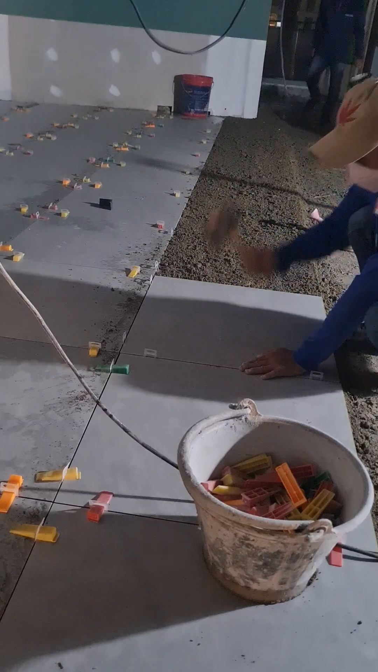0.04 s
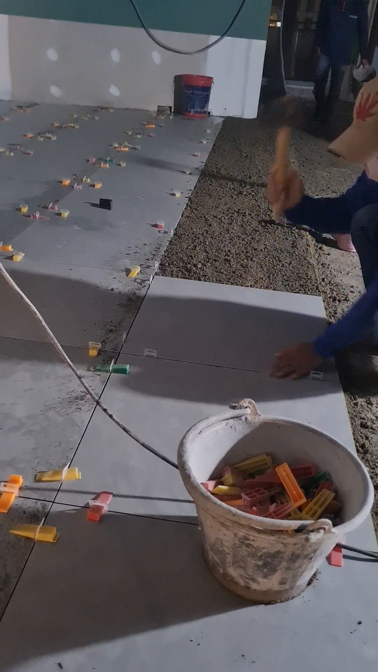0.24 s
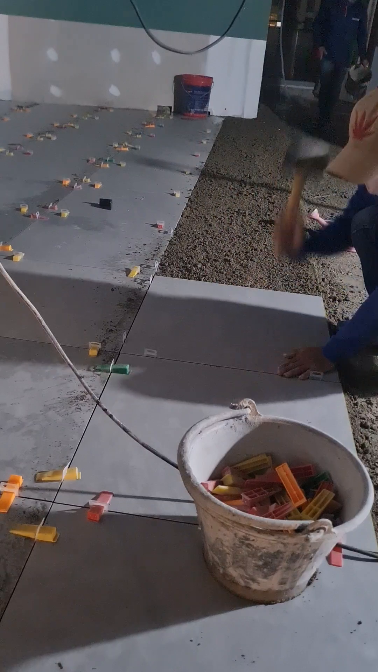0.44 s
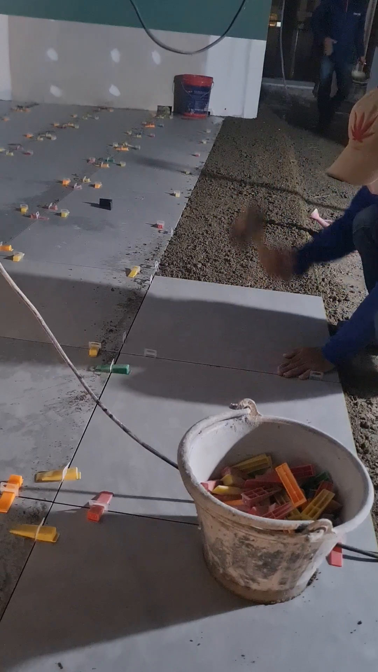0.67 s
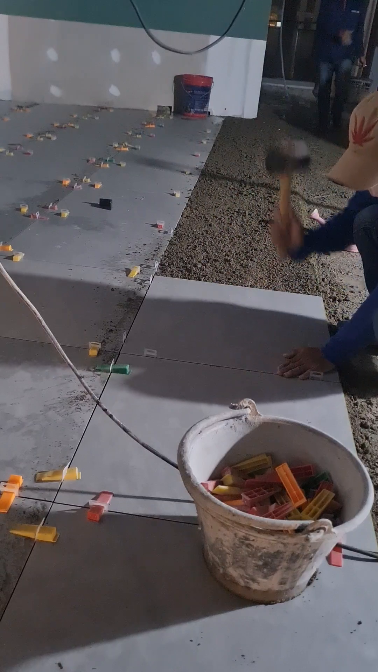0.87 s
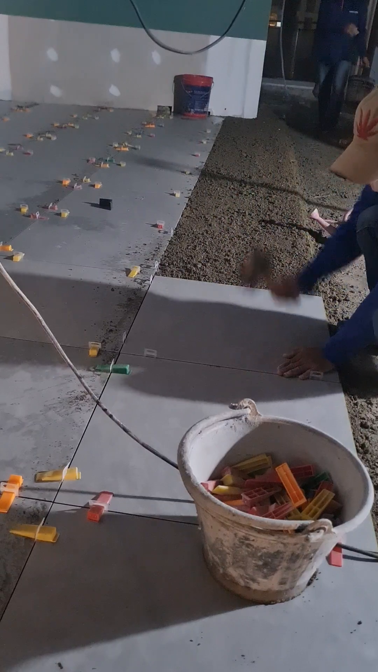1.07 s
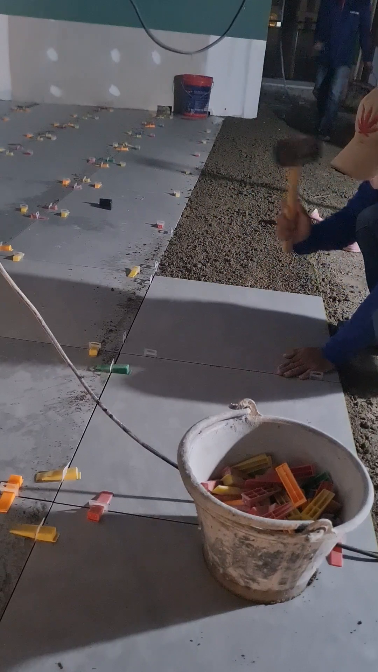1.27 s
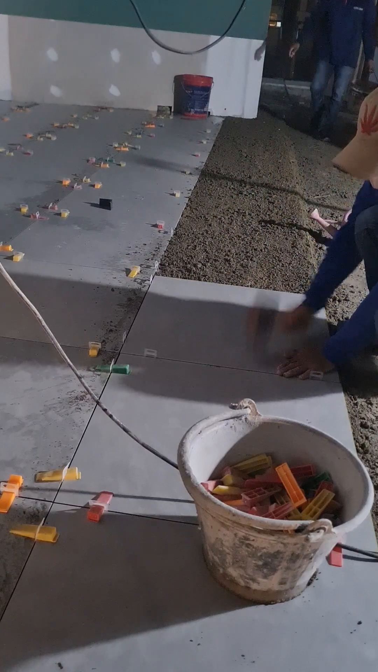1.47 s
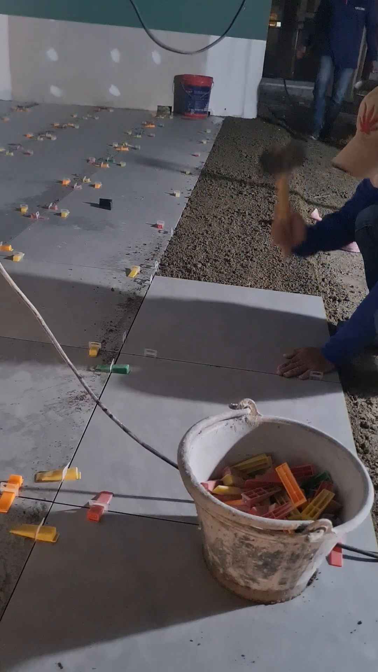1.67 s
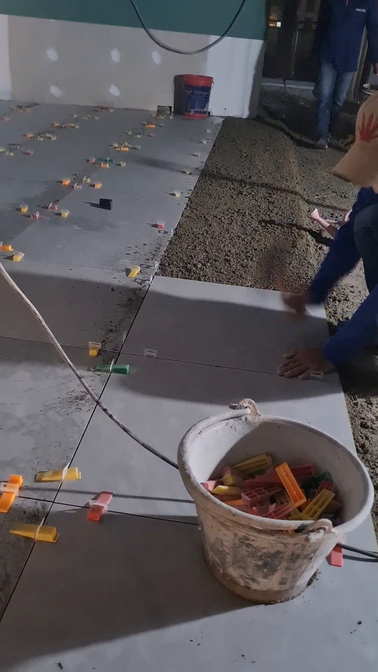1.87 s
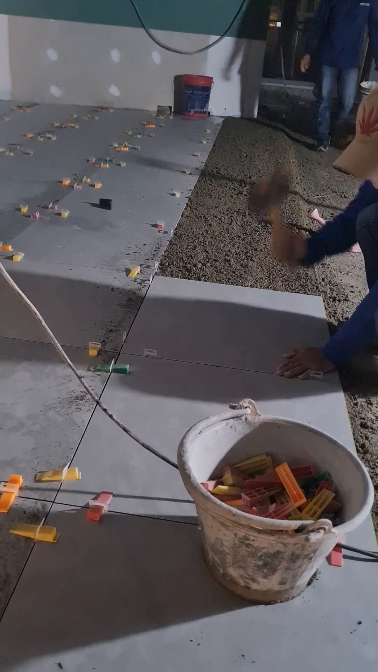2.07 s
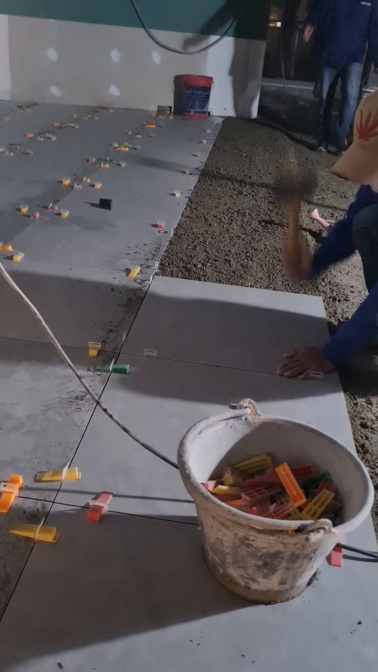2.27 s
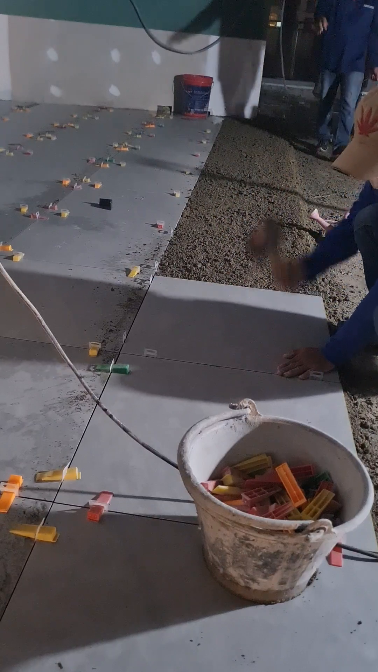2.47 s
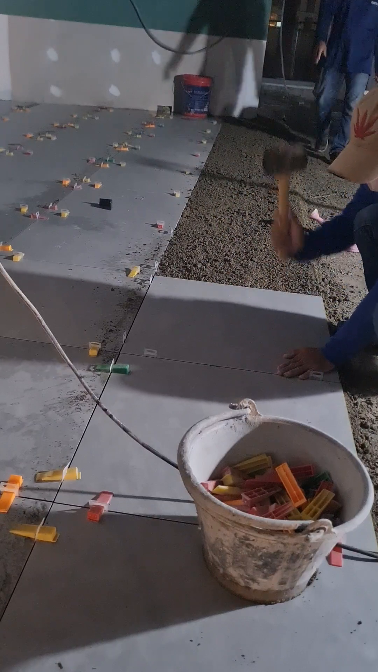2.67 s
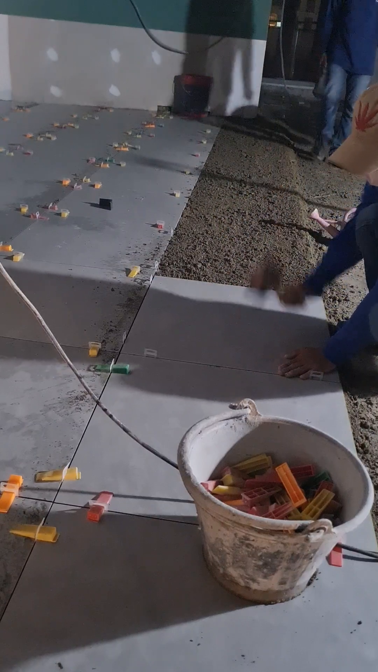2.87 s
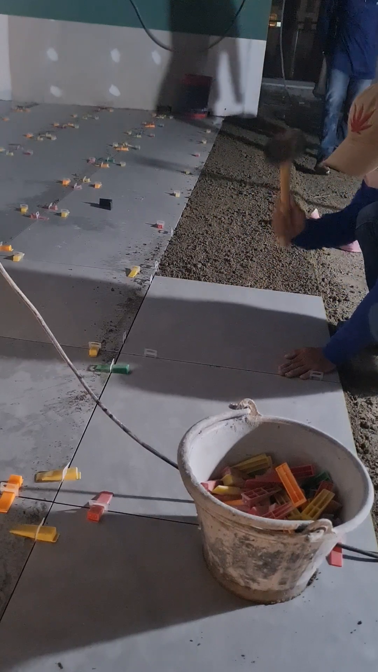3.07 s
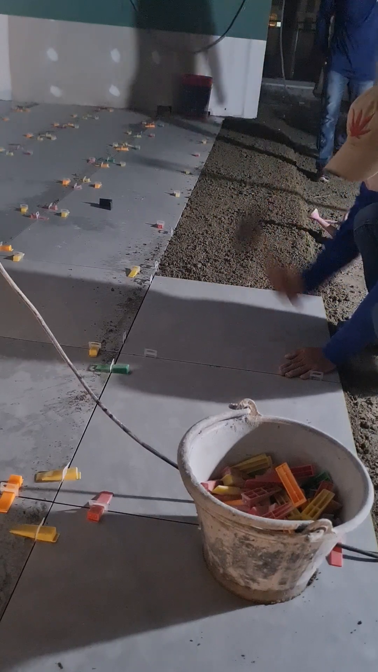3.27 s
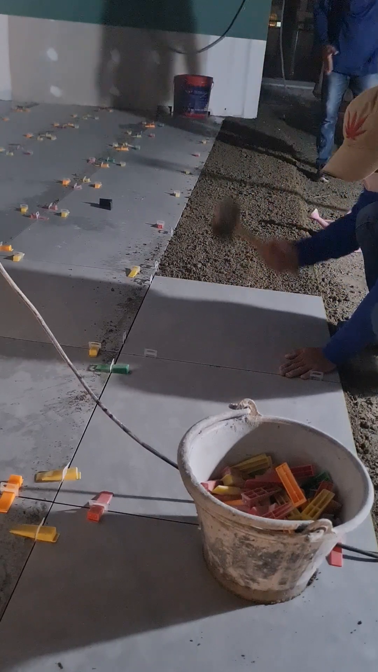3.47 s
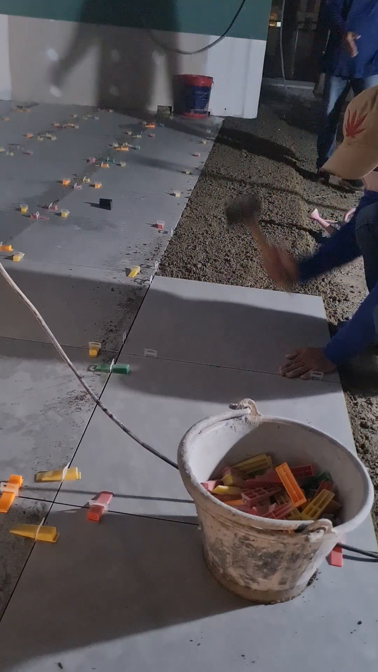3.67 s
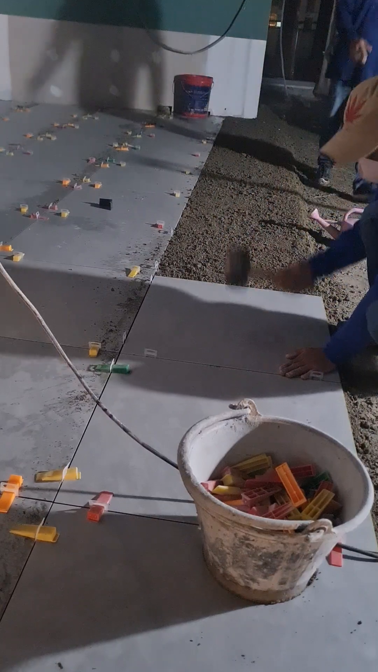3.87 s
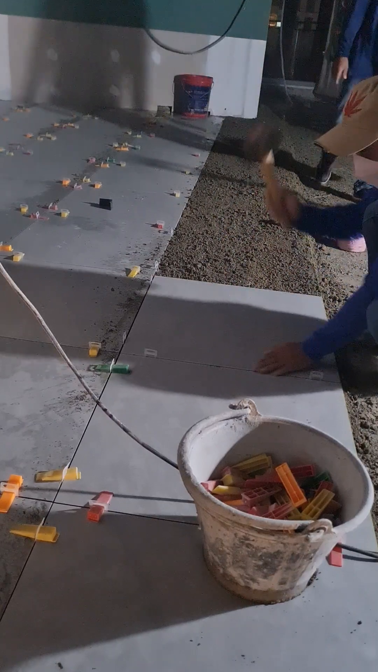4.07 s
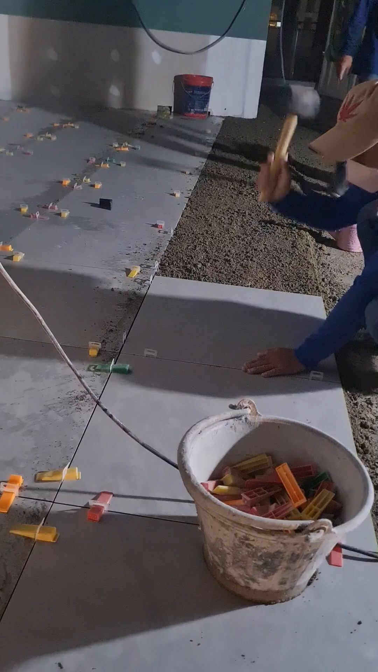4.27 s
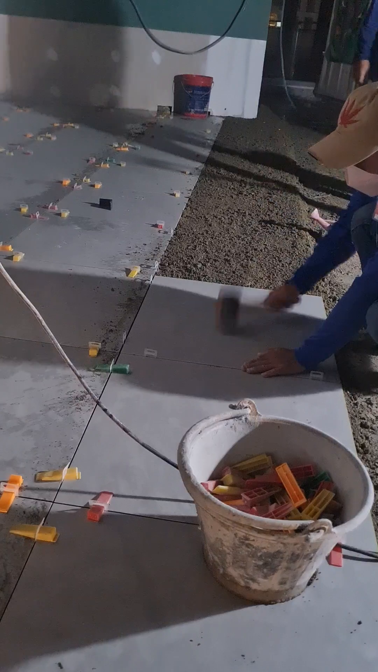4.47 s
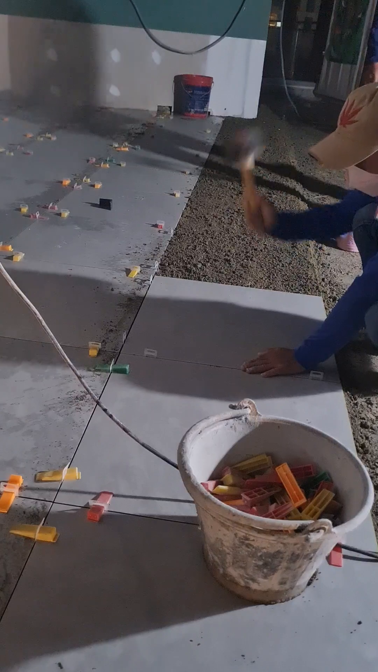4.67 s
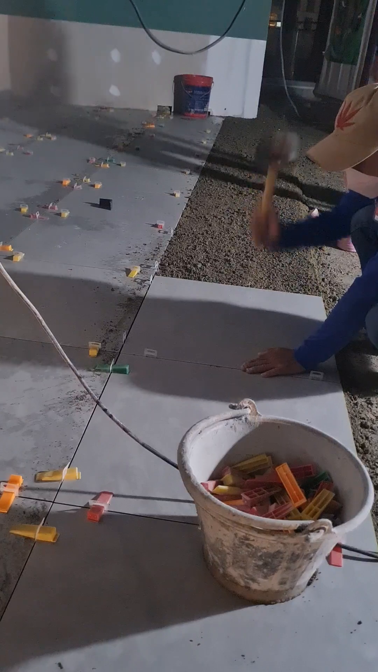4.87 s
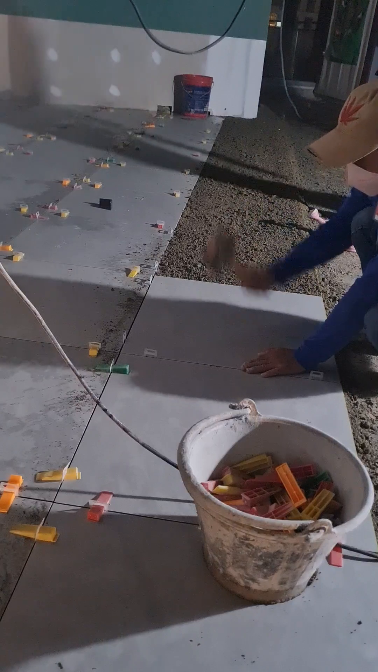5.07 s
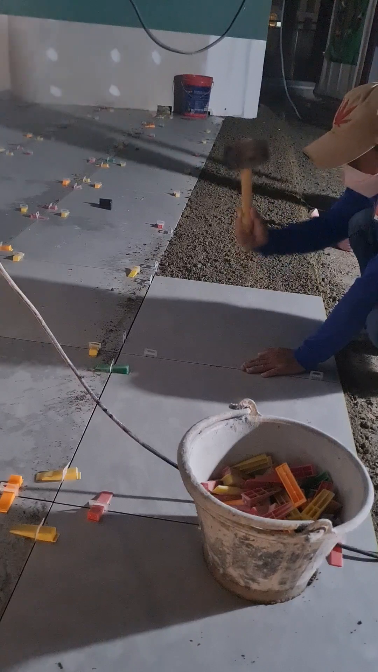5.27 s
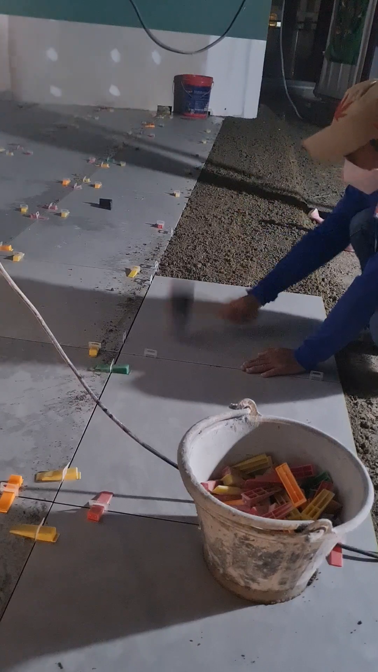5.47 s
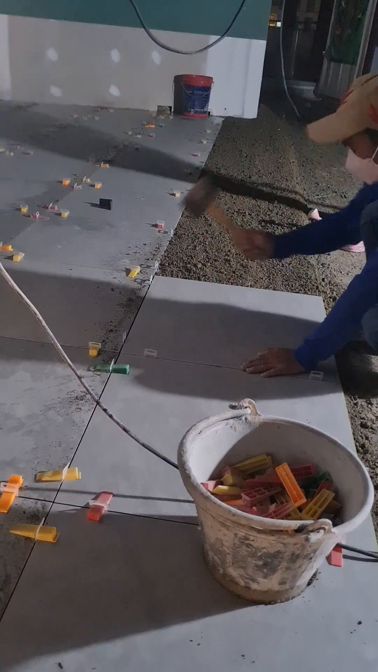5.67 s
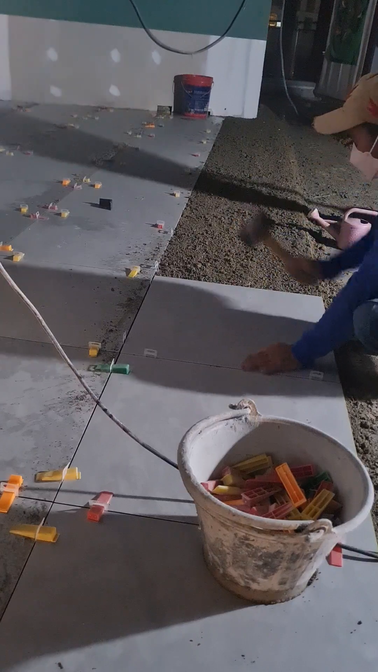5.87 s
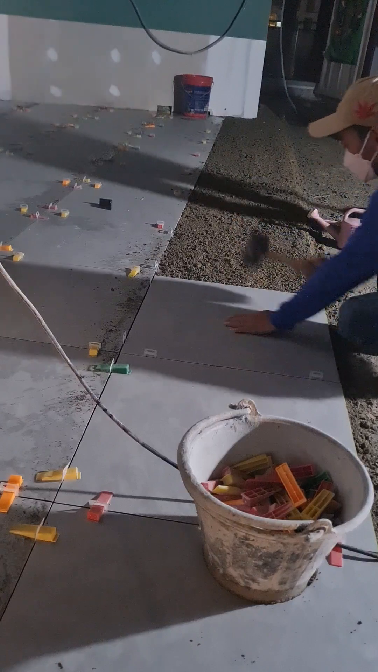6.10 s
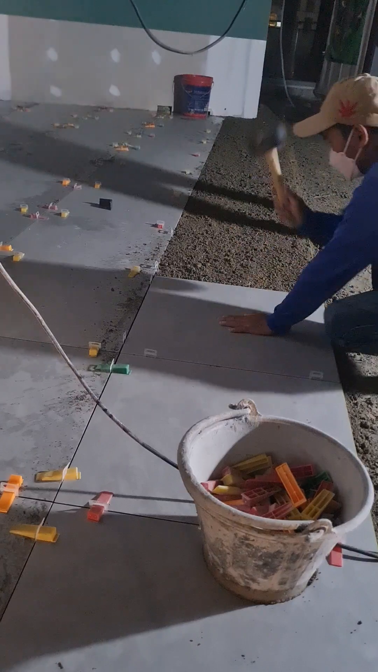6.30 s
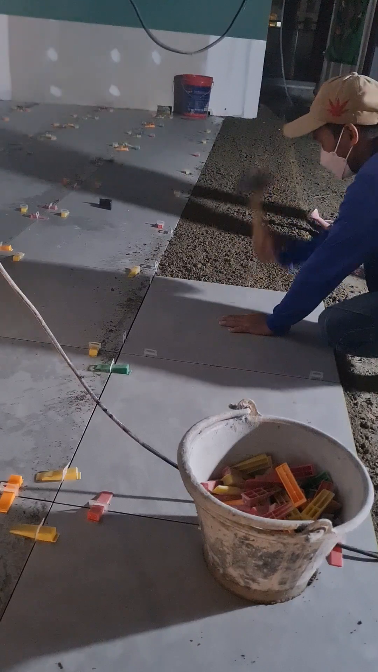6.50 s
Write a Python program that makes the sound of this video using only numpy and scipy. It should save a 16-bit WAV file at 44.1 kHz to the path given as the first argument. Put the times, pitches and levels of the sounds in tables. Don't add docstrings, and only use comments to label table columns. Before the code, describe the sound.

The tail of an earlier mallet blow fades at the start with a brief gritty scuff. From 0.6 seconds, a rubber mallet hits a large floor tile close by, at about 0.6, 1.0, 1.5, 1.95, 2.4 and 2.85: low thud, short knock and airy slap, ringing through a bare concrete hall. A hard wedge tick follows the 1.5 blow, with light rubber grazes around 1.6 and faint wedge chatter near 2.0 and 2.7. Blows at 3.4 and 3.8 are duller, with little slap. After a gap with a small low tap at 4.4, fuller slapping blows land at 4.5, 5.0 and 5.5, the last followed by a sharp grit click. Its resonance dies away; soft scuffing and a low tap come around 6.1, then a tiny tick near 6.5. Faint grit drags and distant site rumble continue throughout.

```python
import sys
import numpy as np
from scipy import signal
from scipy.fft import rfft, irfft
from scipy.io import wavfile
from scipy.ndimage import uniform_filter1d

SR = 44100
rng = np.random.default_rng(int(sys.argv[2]) if len(sys.argv) > 2 else 0)


def to_wav(sig):
    pcm = np.clip(np.atleast_2d(sig), -1, 1) * 32767
    pcm = np.round(pcm).astype(np.int16)
    wavfile.write(sys.argv[1], SR, pcm.T)


def field_ratio(decibels):
    return 10 ** (np.asarray(decibels, dtype=float) / 20)


N = 288414
LEAD = SR // 4

# (time [s], slap [dB], thud [dB], knock [dB], contact [ms])
BLOWS = [(0.5961, -8, -21, -16, 1), (1.0435, -8.5, -19, -14.5, 0.88), (1.4914, -5, -19.5, -14.5, 0.88),
         (1.95, -7, -19.5, -13, 0.94), (2.403, -6, -19, -14, 0.78), (2.8537, -11, -19.5, -12.5, 1.15),
         (3.367, -24, -15.5, -12, 1.03), (3.804, -30.5, -14, -14.5, 2), (4.5119, -8, -14, -14, 1.17),
         (5.034, -9, -13, -9, 1.5), (5.4863, -24, -25.5, -14, 1.2), (5.4926, -8, -14, -15.5, 0.74)]
EARLIER_BLOW = (-.07, -11, -19.5, -18, .9)
# (time [s], slap [dB])
TOUCHES = [
    (1.6107, -24),
    (1.6483, -26),
]
MOVE_TIMES_S = [3.2, 4.2, 4.9, 5.49]
SPOT_TREBLE_DB = [-11.5, -12, -18, -24.5, -10]
# (frequency [Hz], level [dB])
SLAP_SPECTRUM = [(300, -5), (800, 3.5), (1600, 3.5), (2500, -4), (4500, -1.5), (7000, -1.5), (10000, -2.5),
                 (14000, -3.5), (17000, -16)]
# (frequency [Hz], left minus right [dB])
SLAP_LEAN = [(300, 5.5), (3500, -1), (5500, 7), (8000, 2.5), (11000, -2), (14000, 0)]
# (delay [s], level [dB])
FLOOR_ECHO = (0.00421, -20)
# (time [s], level [dB], frequency [Hz], T60 [s], pan [dB])
TICKS = [
    (1.512, -13.5, 2120, 0.013, 0),
    (1.535, -27, 2020, 0.028, 16),
    (1.6492, -23, 2430, 0.0084, -4),
    (2.0, -28.5, 2010, 0.053, -2),
    (4.37, -28, 432, 0.021, -3),
    (5.523, -12, 5230, 0.0033, -12),
    (6.102, -25.5, 425, 0.017, 7),
    (6.519, -41, 630, 0.09, 0),
]
# (frequency [Hz], T60 [s])
HALL_T60 = [(60, 1), (160, 0.91), (420, 0.79), (650, 0.73), (1300, 0.68), (2900, 0.77), (7000, 0.61),
            (14000, 0.41)]
# (frequency [Hz], level [dB])
HALL_SPECTRUM = [(45, -20), (80, -5.5), (160, 1), (420, -5), (640, 0.5), (950, -5), (1400, -3.5),
                 (2900, -0.5), (7000, 2.5), (15000, -3)]
# (delay [s], level [dB], pan [dB])
WALL_ECHOES = [(0.0157, -18.5, 14), (0.0315, -18.5, 16)]
# (frequency [Hz], level [dB], T60 [s])
SPOT_MODES = [
    [(110.4, -1.5, 0.7), (158.2, -5.5, 1), (210.3, 0, 0.63), (311.3, -4.5, 0.98), (340.5, -3.5, 0.99),
     (454, 1, 0.28)],
    [(104.6, -13, 1.0), (123.7, -3.5, 0.4), (175, -15, 0.4), (230.6, 4.5, 0.33), (299.6, -3.5, 0.88)],
    [(120, -4, 1.0), (171, 0.5, 0.82), (177.7, 0, 1), (414, 4.5, 0.26)],
    [(129.3, -2.5, 0.57), (164, -2.5, 0.8), (174, -5, 1), (450.5, 1, 0.21)],
    [(129, 3, 0.5), (167.5, -5.5, 0.94), (193, -2, 0.84), (266, 3.5, 0.78), (288, 7.5, 0.89),
     (300, 7.5, 0.69)],
]
# (bass [dB], treble [dB])
SPOT_REACH = [(1, 1.5), (-5, -6), (1, 0), (-2.5, -4), (-1.5, 2.5)]
# (frequency [Hz], correlation [0-1])
CHANNEL_LIKENESS = [(60, 1), (180, 0.92), (400, 0.68), (800, 0.063), (1600, 0), (5000, 0), (15000, 0)]
# (frequency [Hz], left minus right [dB])
DIFFUSE_LEAN = [(60, 1.5), (500, 2.6), (2000, 2.5), (6000, 3), (8000, 5.5), (10500, -1), (13000, 4),
                (16000, -5)]
# (peak time [s], level [dB], rise [s], fall [s], tilt [dB/octave])
SCUFFS = [(0.005, -31, .05, 0.16, 5.3), (.25, -46, 0.9, 0.26, 0.5), (.7, -42.5, 0.15, 0.27, 0.5),
          (.85, -48, 0.026, 0.079, 3), (1.02, -44, 0.12, 0.092, 4.5), (1.43, -47, 0.95, 0.34, -0.5),
          (1.8, -48, 0.26, 0.55, 1.4), (2.1, -43.5, 0.32, 0.34, -1), (2.62, -49.5, 0.3, .2, 1),
          (2.74, -44.5, 0.13, 0.35, 0), (3.1, -46.5, 0.45, 0.39, 1.8), (3.32, -49.5, 0.17, 0.28, -2),
          (3.781, -46.5, 0.037, 0.23, -1), (3.94, -42.5, 0.16, 0.21, 2.7), (4.19, -51.5, 0.073, 0.43, 1.7),
          (4.31, -49, 0.043, 0.3, -1), (4.7, -49, .3, 0.16, 2), (4.92, -45.5, 0.35, 0.36, 1),
          (5.75, -50, 0.36, 0.41, -3), (5.95, -52.5, .25, 0.28, 6.5), (6.12, -41.5, 0.39, 0.22, 1.7),
          (6.53, -51.5, 0.14, .1, 2)]
# (frequency [Hz], level [dB])
GRIT_SPECTRUM = [(200, -13), (500, -10), (1200, -9.5), (2500, -11), (4200, -14.5), (8000, -24),
                 (12000, -33), (15800, -38)]
# (time [s], length [s], level [dB], frequency [Hz], width [Hz])
CHATTER = [(.945, 0.098, -42, 2840, 900), (1.57, 0.25, -47, 2190, 190), (2.03, 0.13, -53, 12600, 1700),
           (1.996, .12, -43, 1900, 250), (2.703, 0.049, -41, 1500, 600), (2.748, .06, -45, 2200, 350),
           (4.308, 0.11, -48, 1860, 800), (6.512, .03, -46.5, 1360, 450), (6.505, .04, -48, 640, 120),
           (1.2, 0.14, -61, 12000, 1800), (.915, .008, -59, 11300, 1500)]
# (frequency [Hz], level [dB])
SITE_SPECTRUM = [(15, -41), (28, -10), (65, 14), (190, 11.5), (320, -1), (480, -12.5), (900, -13),
                 (3000, -47), (7000, -38), (10000, -48), (15800, -44)]
# (frequency [Hz], gain [dB])
MIC_RESPONSE = [(100, 0), (5000, 0), (8000, 1.5), (9600, 0.5), (11500, 3.1), (13000, 2.5), (15500, 5.5)]


def read(points, hz):
    f, value = np.transpose(points)
    return np.interp(np.log(hz + 1), np.log(f + 1), value)


def evened(x):
    return x / np.sqrt(np.mean(x ** 2) + 1e-20)


def add(mix, start_s, sound):
    part = mix[..., LEAD + round(start_s * SR):][..., :sound.shape[-1]]
    part += sound[..., :part.shape[-1]]


def ring(hz, t60_s, t):
    return field_ratio(-60 * t / t60_s) * np.sin(2 * np.pi * hz * t)


def sides(pan_db):
    return field_ratio(np.array([[pan_db / 2], [-pan_db / 2]]))


def wide_noise(field_db, size, likeness):
    frames, hz = size // 128 + 6, np.fft.rfftfreq(512, 1 / SR)[:, None]
    a, b, c, d = rng.standard_normal((frames, len(hz), 4)).T
    left, other = a + 1j * b, c + 1j * d
    same = np.clip(likeness * read(CHANNEL_LIKENESS, hz), -1, 1)
    z = np.array([left, same * left + np.sqrt(1 - same ** 2) * other])
    lean_db = read(DIFFUSE_LEAN, hz) / 2
    z *= field_ratio(field_db(hz, np.arange(frames) * 128 / SR) + np.array([lean_db, -lean_db]))
    z *= hz < 15900
    return signal.istft(z, nperseg=512, noverlap=384)[1][:, :size]


def blow_body(thud_db, knock_db, contact_ms, t):
    contact = np.sin(np.pi * np.minimum(1000 * t / contact_ms, 1)) ** 2
    thud = ring(155, 0.026, np.maximum(t - .0006, 0))
    knock = .5 * ring(700, .011, t) * np.minimum(t / .0024, 1) - ring(440, .017, t)
    rebound = 0.88 * ring(810, 0.01, np.maximum(t - .0015, 0)) + 0.078 * ring(1200, 0.0056, t)
    body = field_ratio(thud_db + 12) * thud + field_ratio(knock_db + 8.5) * (knock + rebound)
    body = signal.fftconvolve(body, contact / contact.sum())[:len(t)]
    delay_s, echo_db = FLOOR_ECHO
    body = body + field_ratio(echo_db) * np.roll(body, round(delay_s * SR))
    return signal.lfilter(*signal.butter(2, 70, "high", fs=SR), body)


def slap(slap_db, treble_db, t):
    hz = np.fft.rfftfreq(len(t), 1 / SR)
    treble_slope = np.clip(np.log2(hz / 3500 + 1e-9) / 1.35, 0, 1)
    colour = field_ratio(read(SLAP_SPECTRUM, hz) + (treble_db + 3.5) * treble_slope)
    colour = colour * field_ratio(np.outer([.5, -.5, 0], read(SLAP_LEAN, hz)))
    shared, *own, tint = rng.standard_normal((4, len(t)))
    squeeze_db = -1800 * t - 60 * np.maximum(t - .0022, 0) / 0.0092
    onset = np.clip((t - .0002) / 0.00053, 0, 1)
    z = rfft((shared + 0.93 * np.array(own)) * field_ratio(squeeze_db) * onset)
    close = z / abs(z) ** .6
    tint = uniform_filter1d(uniform_filter1d(tint, size=150), size=150)
    tint_db = 1.5 * evened(tint)[:len(hz)]
    far = field_ratio(tint_db) * np.exp(-2j * np.pi * hz * (.0015 + hz * 4e-8))
    puff = irfft(np.vstack([close, far]) * colour)
    puff[:, 1000:] = 0
    rms = np.sqrt(np.mean(puff ** 2, axis=1))
    return field_ratio(slap_db - 22.5) * puff / rms[[0, 0, 2], None]


def blow(slap_db, thud_db, knock_db, treble_db, contact_ms):
    t = np.arange(4096) / SR
    return blow_body(thud_db, knock_db, contact_ms, t) + slap(slap_db, treble_db, t)


def tick(level_db, hz, t60_s, pan_db):
    t = np.arange(SR) / SR
    pair = ring(hz, t60_s, t) + .5 * ring(hz * 1.55, t60_s * .4, t)
    pair *= np.minimum(t * hz / 1.8, 1)
    return field_ratio(level_db) * sides(pan_db)[[0, 1, 0]] * pair


def hall(modes, bass_db, treble_db):
    t = np.arange(round(1.3 * SR)) / SR
    reach = [(600, bass_db), (1500, treble_db)]

    def field_db(hz, s):
        return read(HALL_SPECTRUM, hz) + read(reach, hz) - 60 * s / read(HALL_T60, hz)
    tail = wide_noise(field_db, len(t), 0.98)
    tail *= np.interp(t, [.002, .004, .011, .016, .03], [0, .25, .3, .8, 1])
    tail *= field_ratio(-3.0) / 400
    echoes = np.zeros_like(tail)
    for delay_s, db, pan_db in WALL_ECHOES:
        echoes[:, round(delay_s * SR)] = field_ratio(db + treble_db) * sides(pan_db)[:, 0]
    tail = tail + signal.lfilter(*signal.butter(2, [2500, 11000], "band", fs=SR), echoes)
    for hz, db, t60_s in modes:
        tail += field_ratio(db - 56.5) * ring(hz, t60_s, t) * np.minimum(t / 0.015, 1)
    return tail


def knocks():
    spots = np.zeros((len(SPOT_MODES), 3, LEAD + N))
    for s, slap_db in TOUCHES:
        add(spots[0], s, blow(slap_db, -73, -73, treble_db=-5, contact_ms=0.62))
    for s, slap_db, thud_db, knock_db, contact_ms in [EARLIER_BLOW] + BLOWS:
        spot = np.searchsorted(MOVE_TIMES_S, s)
        add(spots[spot], s, blow(slap_db, thud_db, knock_db, SPOT_TREBLE_DB[spot], contact_ms))
    for s, *settings in TICKS:
        add(spots[np.searchsorted(MOVE_TIMES_S, s)], s, tick(*settings))
    mix = spots.sum(0)[:2]
    for source, modes, reach in zip(spots, SPOT_MODES, SPOT_REACH):
        mix = mix + signal.fftconvolve(source[2:], hall(modes, *reach), axes=1)[:, :LEAD + N]
    return mix[:, LEAD:]


def scuffs():
    peak_s, level_db, rise_s, fall_s, tilt_db = np.transpose(SCUFFS)[:, :, None]
    flicker = evened(uniform_filter1d(rng.standard_normal(N // 128 + 6), size=3))

    def field_db(hz, t):
        away = np.maximum((peak_s - t) / rise_s, (t - peak_s) / fall_s)
        swell = field_ratio(2 * (level_db - 15 * away))
        colour = field_ratio(2 * tilt_db.T * np.log2(hz / 4000 + 0.017))
        drags_db = 10 * np.log10(colour @ swell + 1e-12)
        return read(GRIT_SPECTRUM, hz) + drags_db + 0.79 * flicker
    return field_ratio(22.5) * wide_noise(field_db, N, 1.0) / np.sqrt(257)


def chatter():
    mix, t = np.zeros((2, LEAD + N)), np.arange(SR // 2) / SR
    clicks_per_cycle, fade_db = 0.41, -3.5
    for s, length_s, db, hz, width_hz in CHATTER:
        hit, size = rng.random((2, 2, len(t)))
        clicks = (hit < clicks_per_cycle * hz / SR) * np.log(size + 1e-9) * (t < length_s)
        resonance = ring(hz, 2.2 / width_hz, t) * np.minimum(t * width_hz * 3, 1)
        rung = signal.fftconvolve(clicks, resonance[None, :1024], axes=1)[:, :len(t)]
        ends = np.clip(np.minimum(8 * t / length_s, 2.5 * (1.1 - t / length_s)), 0, 1)
        level = np.sqrt(length_s / t[-1]) * field_ratio(db + fade_db * t / length_s)
        add(mix, s, evened(rung) * level * ends)
    return mix[:, LEAD:]


def site():
    return field_ratio(-47.5) * evened(wide_noise(lambda hz, s: read(SITE_SPECTRUM, hz) + 0 * s, N, 1.0))


def scene():
    return knocks() + scuffs() + chatter() + site()


def roll_off(x):
    return signal.sosfilt(signal.butter(12, 17160, fs=SR, output="sos"), x)


def record(dry):
    x = signal.lfilter(*signal.butter(3, 58, "high", fs=SR), dry)
    x = irfft(rfft(x) * field_ratio(read(MIC_RESPONSE, np.fft.rfftfreq(N, 1 / SR))), N)
    x = x / (1 + (abs(x) / .97) ** 4) ** (1 / 4)
    lowpass = signal.firwin(255, 16700, window=("kaiser", 8), fs=SR)
    x = signal.oaconvolve(x, lowpass[None], "same")
    return roll_off(x)


dry = scene()
out = record(dry)
to_wav(out)
```